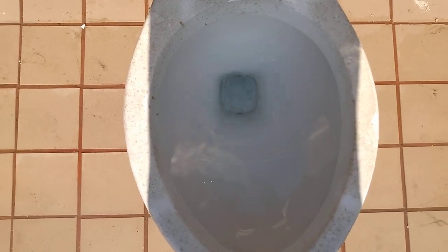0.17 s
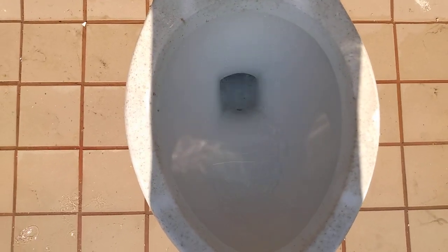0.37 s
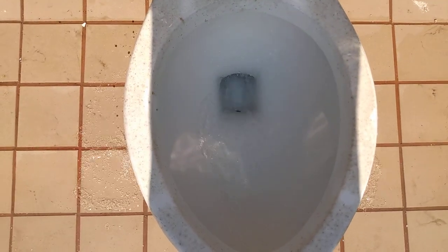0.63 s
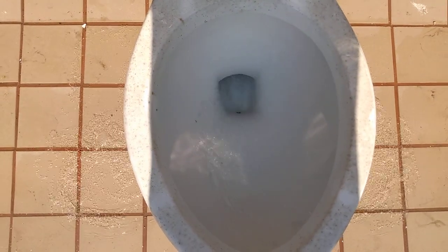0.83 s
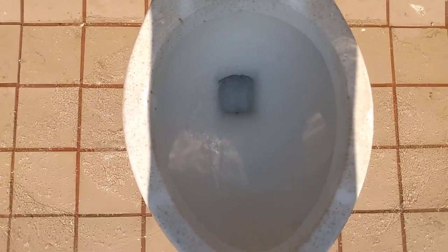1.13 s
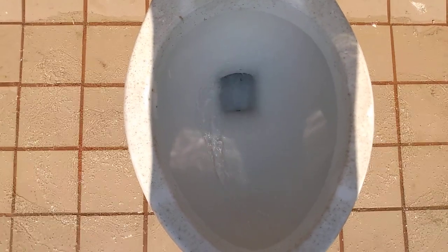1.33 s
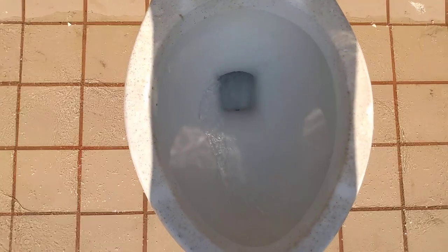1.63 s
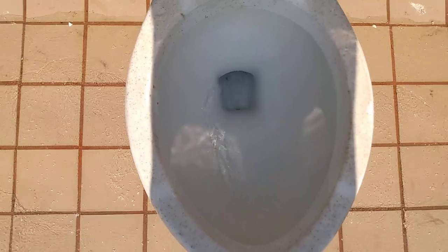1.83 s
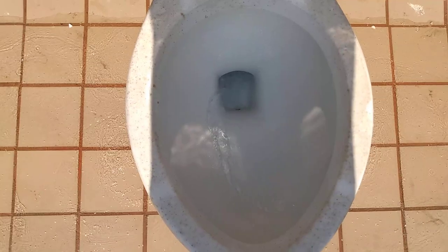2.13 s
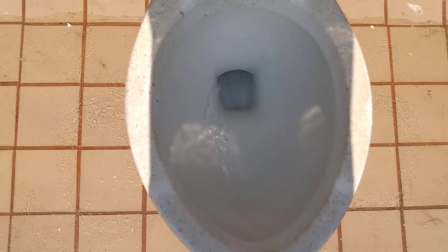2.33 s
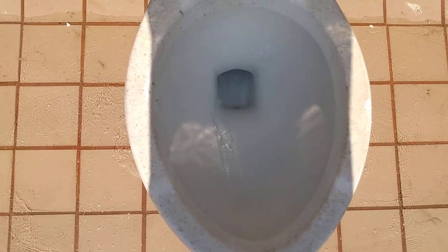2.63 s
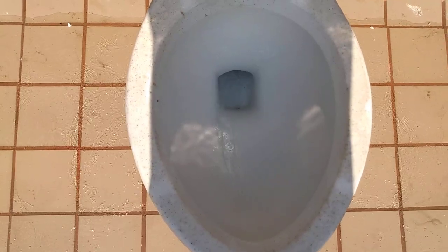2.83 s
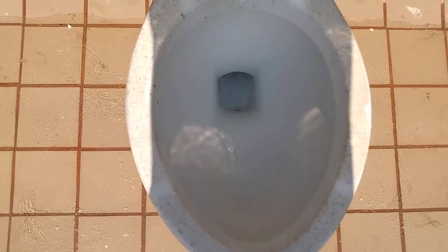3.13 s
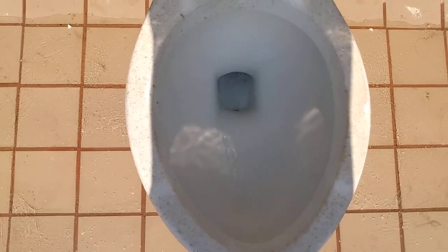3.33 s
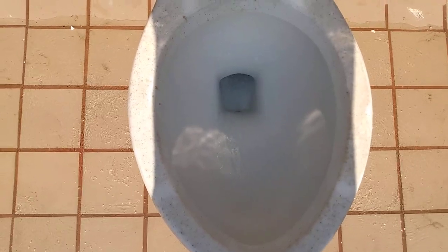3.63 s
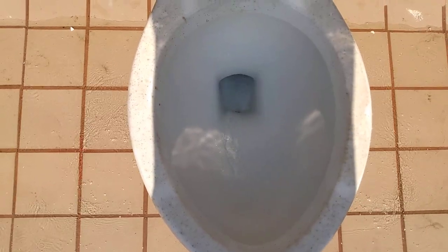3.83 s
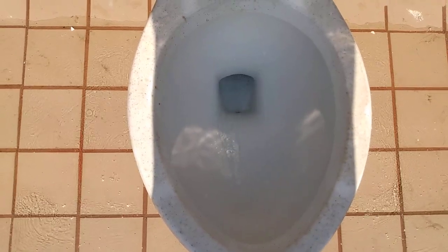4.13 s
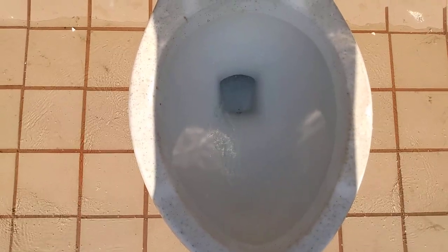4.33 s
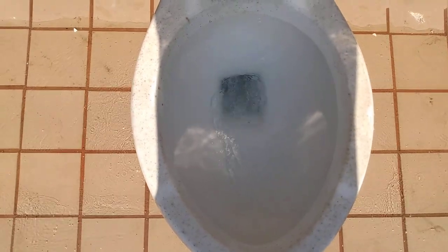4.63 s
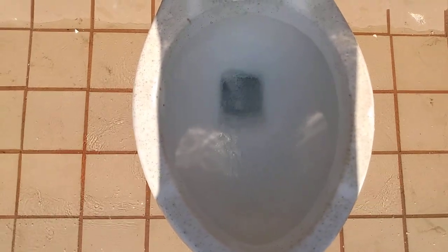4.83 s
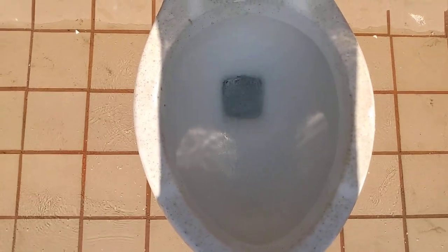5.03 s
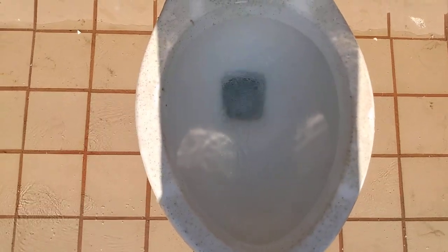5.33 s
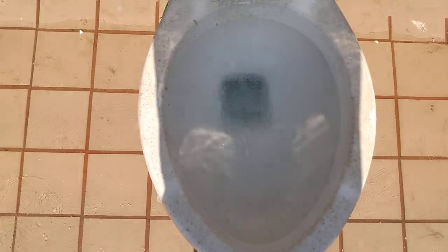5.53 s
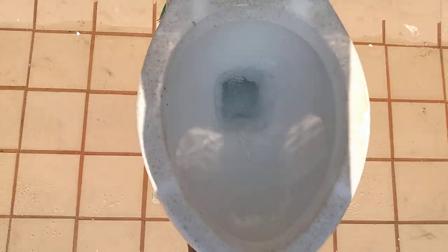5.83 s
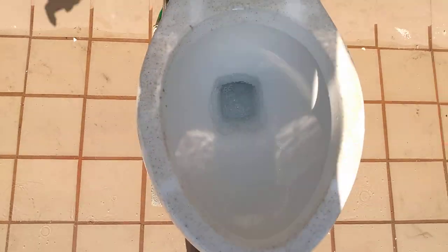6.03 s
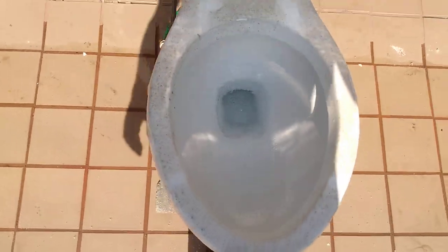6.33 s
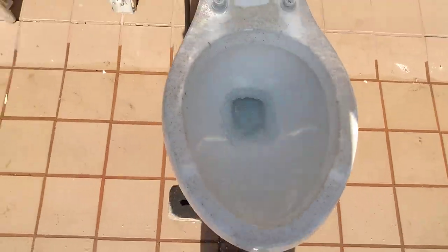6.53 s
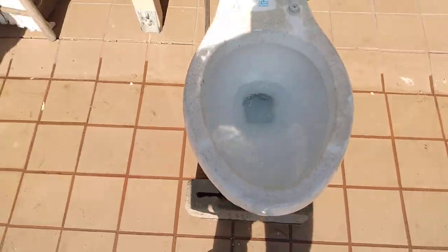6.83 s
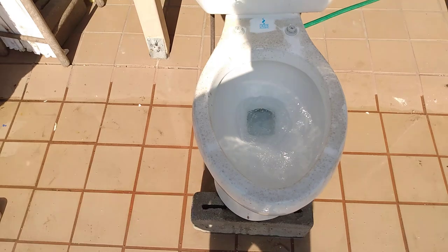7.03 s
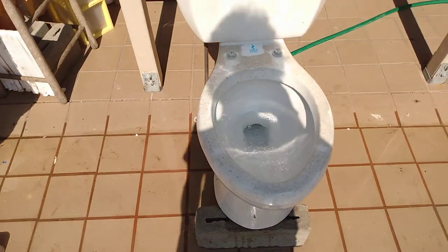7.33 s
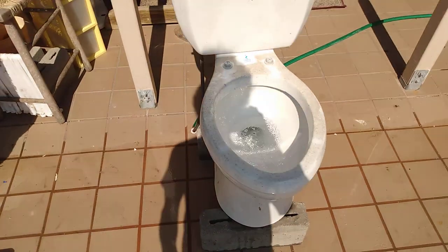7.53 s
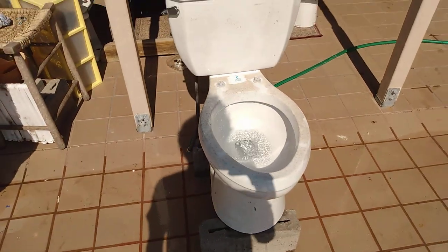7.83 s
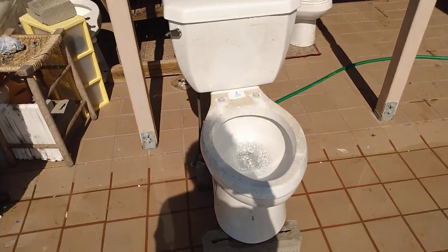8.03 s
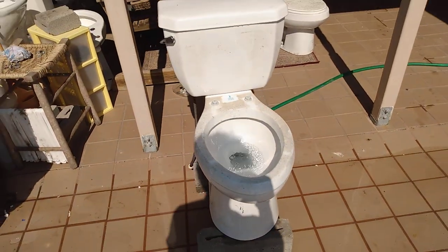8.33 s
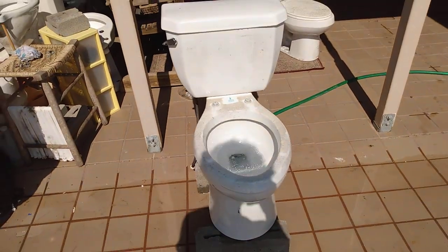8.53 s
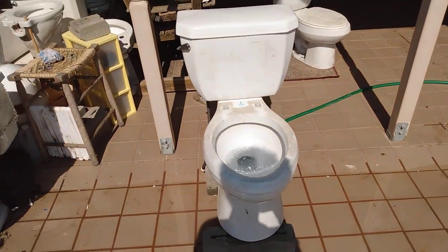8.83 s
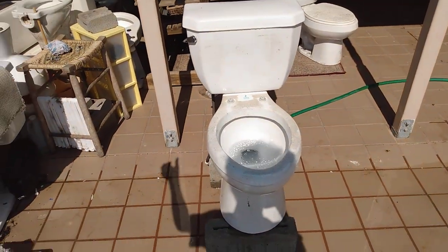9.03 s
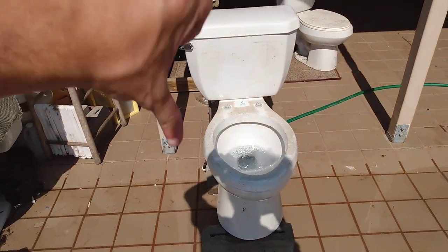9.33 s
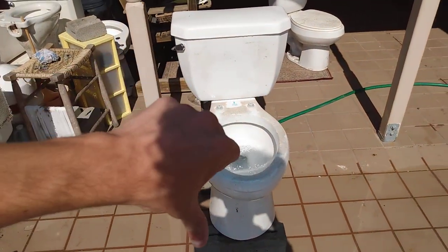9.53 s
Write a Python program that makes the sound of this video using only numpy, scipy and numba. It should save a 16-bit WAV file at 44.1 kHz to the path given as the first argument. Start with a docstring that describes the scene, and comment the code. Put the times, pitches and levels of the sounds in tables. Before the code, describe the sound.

A toilet flushes in the open air, heard by a stereo microphone just over the bowl. Booming air bubbles come first, then two wet, rising slurps, then a lively rush of spray, slaps and gurgles echoing tightly in the porcelain. It sags as the tank empties, babbles and cuts off. Small plops and trickles die away over steady valve hiss, and finally a gentle stream churns the pool.

```python
"""A toilet in the open air flushes, heard from just above the bowl. First air gulps boom in the bowl over a
gurgle of bubbles and noise, and two slurps of mostly climbing bubbles suck the pool out. Then splash and
spray, noise bursts and impacts echoed by the porcelain, spatter and sink as the tank runs down; the jet
stops, and last plops, sloshing, runnels and drips follow. The fill valve, filtered noise, hisses beneath
from the first half second; at the end the refill stream, a rush of tiny impacts, churns the pool."""
import sys
import numpy as np
from scipy import signal
from scipy.fft import rfft, irfft, next_fast_len
from scipy.io import wavfile
from scipy.ndimage import uniform_filter1d
from numba import njit

SR = 44100
rng = np.random.default_rng(int(sys.argv[2]) if len(sys.argv) > 2 else 0)


def materialize(psi):
    """Save the field psi as 16-bit PCM at rate SR to the path in sys.argv[1].

    A 1-D psi becomes a single channel; in a 2-D psi each row is a channel.
    """
    bounded = np.clip(np.atleast_2d(psi).T, -1, 1)
    quanta = np.round(bounded * 32767).astype(np.int16)
    wavfile.write(sys.argv[1], SR, quanta)


N = 427329
TIME = np.arange(N) / SR


def undb(db):
    """Decibels to gain."""
    return 10 ** (np.asarray(db) / 20)


def curve(table, column=1):
    """One column of a table, joined by straight lines in time and held beyond both ends."""
    rows = np.array(table)
    return np.interp(TIME, rows[:, 0], rows[:, column])


def hump(middle_s, length_s):
    """A smooth rise and fall between 0 and 1."""
    out = np.zeros(N)
    inside = slice(*np.searchsorted(TIME, [middle_s - length_s / 2, middle_s + length_s / 2]))
    out[inside] = np.cos(np.pi * (TIME[inside] - middle_s) / length_s) ** 2
    return out


def humps(table):
    """Gain of several humps, each row: middle in s, length in s, level in dB."""
    return sum(undb(db) * hump(middle_s, length_s) for middle_s, length_s, db in table)


def colour_db(points, hz):
    """A spectrum read on a log-frequency axis."""
    point_hz, db = np.transpose(points)
    return np.interp(np.log(hz + 1), np.log(point_hz), db)


def shape(x, response):
    """Filter by a response given as a function of frequency."""
    size = next_fast_len(x.shape[-1] + 4096)
    hz = np.arange(size // 2 + 1) * SR / size + .01  # never zero
    return irfft(rfft(x, size) * response(hz), size)[..., :x.shape[-1]]


def tint(x, points):
    """Filter by a spectrum of (Hz, dB) points."""
    return shape(x, lambda hz: undb(colour_db(points, hz)))


def resonance(hz, centre_hz, width_hz):
    """Response of one resonance, gain 1 at its centre."""
    return 1 / (1 + 1j * (hz ** 2 - centre_hz ** 2) / (hz * width_hz))


def unit(x):
    """Scale a stereo pair so that its middle has rms 1."""
    return x / np.std(x.mean(axis=0))


def surge(rate_hz, depth_db):
    """A randomly wandering gain, rate_hz new values a second, with mean power 1."""
    size = max(int(SR / rate_hz), 2)
    steps = np.repeat(rng.standard_normal(N // size + 1), size)
    gain = undb(depth_db * uniform_filter1d(steps, size)[:N])
    return gain / np.sqrt(np.mean(gain ** 2))


@njit
def ring(start_s, hz, cycles, size, rise, swell_cycles):
    """Each bubble is a sine that builds up, dies by 60 dB in its cycles and rises in pitch."""
    out = np.zeros(N)
    for k in range(len(start_s)):
        first, length = int(start_s[k] * SR), int(cycles[k] / hz[k] * SR)
        for i in range(min(length, N - first)):
            age, turn = i / length, i * hz[k] / SR
            envelope = np.exp(-6.9 * age) * (1 - np.exp(-(turn / swell_cycles) ** 2))
            out[first + i] += size[k] * envelope * np.sin(2 * np.pi * turn * (1 + rise * age / 2))
    return out


def swarm(pitch_hz, octaves, cycles, spread_db, count):
    """Bubbles at random moments, scattered in pitch, life and size."""
    when, pitch, life, size = rng.random((count, 4)).T
    centre_hz = np.broadcast_to(pitch_hz, N)[(when * N).astype(int)]
    hz = centre_hz * 2 ** (octaves * (pitch - .5))
    return ring(when * N / SR, hz, cycles * (.5 + life), undb(spread_db * size), 0.44, 1.09)


def drops(spread_db, count):
    """Tiny impacts at random moments: many weak, a few strong."""
    when, size, sign = rng.random((count, 3)).T
    strength = undb(-spread_db * np.log(np.maximum(size, .004)))
    return np.bincount((when * N).astype(int), strength * np.sign(sign - .5), N)


def porcelain(x, t60_s=0.081, split_hz=1400, lead_ms=0.085, stray_db=-20, even=0.067):
    """Quick reflections: treble reaches each port by its own paths, bass mostly straight, first port leading."""
    t = np.arange(2048) / SR
    paths = rfft(rng.standard_normal((2, len(t))) * np.exp(-np.log(1000) * t / t60_s))
    # flatten the paths' spectra, so the echoes colour the sound less
    paths = irfft(paths / np.abs(paths) ** min(even, 1)) * (1 - t / t[-1])
    paths /= np.linalg.norm(paths, axis=1, keepdims=True)
    low = signal.butter(3, split_hz, "low", fs=SR, output="sos")
    high = signal.butter(3, split_hz, "high", fs=SR, output="sos")
    bass = signal.sosfilt(low, signal.unit_impulse(len(t)))
    late_bass = np.interp(t - lead_ms / 1000, t, bass)
    response = np.array([bass, late_bass]) + signal.sosfilt(high, paths) + undb(stray_db) * paths
    return signal.oaconvolve(x[None], response, axes=1)[:, :N]


def bowl_air(x, modes):
    """The hollow of the bowl rings at its air resonances, above 100 Hz."""
    boom = shape(x, lambda hz: sum(undb(db) * resonance(hz, f, w) for f, w, db in modes))
    return signal.sosfilt(signal.butter(2, 100, "high", fs=SR, output="sos"), boom)


def bubbles(table, cycles, rise, swell_cycles, gain_db):
    """Single loud bubbles, each ringing at its own pitch."""
    start_s, db, hz = np.array(table, float).T.copy()
    lives = np.full(len(hz), float(cycles))
    tones = ring(start_s, hz, lives, undb(db + gain_db), float(rise), float(swell_cycles))
    return porcelain(tones, t60_s=0.05, even=0.94)


def puffs(table, decay_s, width_hz, gain_db):
    """Short decaying puffs of noise, each round its own centre."""
    out = np.zeros((2, N))
    t = np.arange(2048) / SR
    for start_s, db, centre_hz in table:
        noise = rng.standard_normal((2, len(t)))
        puff = shape(noise, lambda hz: resonance(hz, centre_hz, width_hz) ** 2)
        first = int(start_s * SR)
        out[:, first:first + len(t)] += unit(puff) * np.exp(-t / decay_s) * undb(db + gain_db)
    return out


def flush():
    """The tank empties: gurgle below, splash and spray above, both throbbing with the same jet."""
    splash_gain, spray_gain = jet_gains()
    churn = churning()
    jet = surge(rate_hz=45, depth_db=1.0)
    above = babble() + jet * (splash() * splash_gain + spray() * spray_gain)
    return above + damped(gurgle()) * churn + heave(churn)


def spatter(colour, spread_db, clump_db, count, spots):
    """Drops strike several spots round the bowl, count on each, arriving in common clumps."""
    clumps = surge(rate_hz=130, depth_db=clump_db)
    hits = sum(porcelain(drops(spread_db, count) * clumps, t60_s=0.034, even=0.93) for _ in range(spots))
    return unit(tint(hits, colour))


# Splash filter. Each row: frequency in Hz, relative level in dB.
SPLASH_FILTER = [(500, -23), (900, -20), (1300, -1), (1900, 2), (2250, -4), (2650, 7), (3500, -5),
                 (4500, 1), (7000, -18)]
# Higher bowl resonances. Each row: centre in Hz, width in Hz, relative level in dB.
BOWL_OVERTONES = [(1032, 8.4, 1), (1266, 55, 5.5), (1516, 48, 1.5), (1660, 45, 4.5), (1810, 44, -2),
                  (2020, 49, 4), (2460, 130, -1.5), (2840, 78, -14)]


def splash():
    """Drops on the bowl, small bubbles, and the higher bowl resonances that drops excite."""
    hits = spatter(SPLASH_FILTER, spread_db=4.0, clump_db=3.0, count=5000, spots=4)
    small_bubbles = unit(porcelain(swarm(2307, octaves=1.33, cycles=51, spread_db=20.0, count=2200)))
    ringing = unit(porcelain(bowl_air(drops(spread_db=6.0, count=12000), BOWL_OVERTONES)))
    return hits + undb(-9.5) * small_bubbles + undb(-3.5) * ringing


# Spray filter. Each row: frequency in Hz, relative level in dB.
SPRAY_FILTER = [(1800, -27), (3400, 0.5), (4400, -6), (5200, -1.5), (6300, -1.5), (7800, 2.5), (9200, 0.5),
                (11000, 4), (13000, -4.5), (16000, -8)]


def spray():
    """Fine drops on bare porcelain, with a fizz of tiny high bubbles."""
    hits = spatter(SPRAY_FILTER, spread_db=3.5, clump_db=1.0, count=9000, spots=5)
    tiny_bubbles = swarm(8420, octaves=1.27, cycles=28, spread_db=23, count=4000)
    fizz = unit(porcelain(tiny_bubbles, t60_s=0.05, even=0.42))
    return undb(1) * hits + undb(-8.0) * fizz


SHUT_S, SHUT_TAKES_S = 4.565, 0.1  # the flapper drops and the jet stops


def run_down(full_db, sag_db, bend, shut_change_db, drain_db_per_s):
    """Level in dB of a sound driven by the head of water: sags, shifts at the shutting while draining away."""
    spent = np.minimum(TIME / SHUT_S, 1)
    after_s = np.maximum(TIME - SHUT_S, 0)
    sagging_db = full_db - sag_db * spent ** bend
    shift_db = shut_change_db * np.minimum(after_s / SHUT_TAKES_S, 1)  # positive = drop, negative = lift
    return sagging_db - shift_db - drain_db_per_s * after_s


# Tank run-down of splash and spray. Columns: full-tank level in dB, sag until empty in dB, bend of the sag
# (1 = even), level change at the shutting in dB (positive = drop, negative = lift), draining in dB per s.
SPLASH_RUN_DOWN = (-21, 15.5, 0.49, -0.5, 54)
SPRAY_RUN_DOWN = (-16.5, 19, 0.82, 4.5, 31)
# The pool smothers the jet until sucked away. Each row: time in s, splash change in dB, spray change in dB.
POOL_SMOTHER = [(0.04, -9.5, -16.5), (0.12, -32, -19), (0.26, -24, -13), (0.285, -4, -12), (0.38, -6, -8.5),
                (0.452, -3, -13), (0.464, -5, 0)]
# The jet swells or falters. Each row: middle in s, length in s, splash change in dB, spray change in dB.
JET_SWELLS = [(0.017, 0.054, -1, 11), (0.944, 0.79, 4, 0), (1.396, 0.12, 3, 1.5), (1.492, 0.13, -4, -5),
              (1.804, 0.09, 6, 3), (2.246, 0.097, 5, -0.5), (3.189, 0.074, 1, 6), (3.988, .08, 6.5, -0.5),
              (4.565, 0.08, 0.5, -1), (4.655, 0.08, -4, -5)]


def jet_gains():
    """Splash and spray gains: head of water, smothering pool, momentary swells."""
    splash_db = run_down(*SPLASH_RUN_DOWN) + curve(POOL_SMOTHER, column=1)
    spray_db = run_down(*SPRAY_RUN_DOWN) + curve(POOL_SMOTHER, column=2)
    for middle_s, length_s, more_splash_db, more_spray_db in JET_SWELLS:
        swell = hump(middle_s, length_s)
        splash_db = splash_db + more_splash_db * swell
        spray_db = spray_db + more_spray_db * swell
    return undb(splash_db), undb(spray_db)


# Bowl air resonances, shared with gulps(). Each row: centre in Hz, width in Hz, relative level in dB.
BOWL_MODES = [(238.5, 5.1, -3), (298.6, 82, 3), (430, 260, -8), (632.3, 53, 5), (684, 37, -3.5),
              (1037, 22, 1), (1227, 170, -4.5)]


def gurgle():
    """Tumbling water and big bubbles drive the air in the bowl."""
    big_bubbles = swarm(416.5, octaves=2.37, cycles=11.7, spread_db=17.0, count=2200)
    tumbling = drops(spread_db=2.5, count=25000)
    push = big_bubbles / big_bubbles.std() * undb(-7.5) + tumbling / tumbling.std() * undb(10.0)
    return unit(porcelain(bowl_air(push * surge(rate_hz=50, depth_db=1.35), BOWL_MODES)))


def damped(x, pool_db=-5.5, gone_s=0.53, above_hz=560):
    """While the pool still fills the bowl, only the deepest part of a sound comes through in full."""
    deep = shape(x, lambda hz: 1 / (1 + (hz / above_hz) ** 8))
    return deep + (x - deep) * undb(pool_db * np.clip(1 - (TIME / gone_s) ** 2, 0, 1))


# Big gulps of air in the trap. Each row: start in s, level in dB before layer gain, pitch in Hz.
AIR_GULPS = [(0.023, -4.5, 306), (.089, -5.5, 278), (0.105, -5, 226), (.158, -11, 215), (.205, -14, 225),
             (.27, -8, 248), (.312, -7.5, 290), (0.347, -6.5, 290), (1.39, -9, 286), (2.062, -18.5, 227),
             (2.117, -15, 232), (2.198, -16.5, 296), (2.253, -16, 260), (2.52, -13.5, 257),
             (2.939, -23, 250), (3.061, -15, 255), (3.433, -20.5, 340), (4.328, -18.5, 288),
             (4.944, -31, 273), (4.979, -29.5, 231)]


def gulps(boom_db=-4):
    """Big pockets of air break through the trap and set the bowl booming."""
    start_s, db, hz = np.array(AIR_GULPS, float).T.copy()
    knocks = np.bincount((start_s * SR).astype(int), undb(db), N)
    boom = bowl_air(knocks, BOWL_MODES)
    boom *= undb(db.max() + boom_db) / np.abs(boom).max()
    tones = bubbles(AIR_GULPS, cycles=12.8, rise=0.077, swell_cycles=1.52, gain_db=4.5)
    return tones + porcelain(boom)


# Tank run-down of the gurgle. Columns: full-tank level in dB, sag until empty in dB, bend of the sag
# (1 = even), level change at the shutting in dB (positive = drop, negative = lift), draining in dB per s.
GURGLE_RUN_DOWN = (-18, 21.5, 0.53, -5.5, 60)
WAKE_DB, WAKE_DECAY_S = -25, 0.056  # churning after each gulp, relative to its table level
ONRUSH_DB, ONRUSH_MIDDLE_S, ONRUSH_LENGTH_S = -25.5, 0.19, 1


def churning():
    """Gurgle gain: head of water, the first onrush through the full pool, a short wake after every gulp."""
    start_s, db, hz = np.array(AIR_GULPS, float).T
    kicks = np.bincount((start_s * SR).astype(int), undb(db + WAKE_DB), N)
    wakes = signal.lfilter([1], [1, -np.exp(-1 / (WAKE_DECAY_S * SR))], kicks)
    onrush = undb(ONRUSH_DB) * hump(ONRUSH_MIDDLE_S, ONRUSH_LENGTH_S)
    return np.sqrt(undb(run_down(*GURGLE_RUN_DOWN)) ** 2 + wakes ** 2 + onrush ** 2)


# Low resonances of the water-filled trap. Each row: centre in Hz, width in Hz, relative level in dB.
TRAP_MODES = [(77, 18, -2), (124.5, 20, 1.5), (167, 33, -2.5)]
# The water column heaves. Each row: middle in s, length in s, level in dB.
COLUMN_HEAVES = [(.14, 0.5, -30), (1.264, 0.61, -48.5), (2.154, 0.41, -47.5), (2.554, 0.14, -42),
                 (3.5, 0.12, -56.5)]


def heave(churn, follow_db=-27):
    """The slug of water in the trap shudders low with the churning, and more at each heave."""
    def modes(hz):
        return sum(undb(db) * np.abs(resonance(hz, f, w)) ** 2 for f, w, db in TRAP_MODES)
    shudder = shape(rng.standard_normal(N), modes)
    return shudder / shudder.std() * (humps(COLUMN_HEAVES) + churn * undb(follow_db))


BABBLE_DB, BABBLE_RISE_S = -45.5, 0.98
BABBLE_SWELL_DB, BABBLE_SWELL_S, BABBLE_DRAIN_DB_PER_S = 5, 0.87, 92.5


def babble():
    """Air drawn into the emptied trap babbles, most of all as the jet gives out."""
    crowd = swarm(1402, octaves=1.6, cycles=24, spread_db=11, count=4200)
    crowd = unit(porcelain(crowd, t60_s=0.034, even=0.92))
    swell_db = BABBLE_SWELL_DB * np.clip(1 + (TIME - SHUT_S) / BABBLE_SWELL_S, 0, 1)
    drain_db = BABBLE_DRAIN_DB_PER_S * np.maximum(TIME - SHUT_S, 0)
    return crowd * np.minimum(TIME / BABBLE_RISE_S, 1) * undb(BABBLE_DB + swell_db - drain_db)


# The pool leaves in two draughts. Each row: time in s, bubble pitch in Hz, level in dB.
FIRST_DRAUGHT = [(.40, 400, -40), (.455, 626, -27), (.48, 850, -17), (.502, 900, -14.5), (.52, 1400, -21.5),
                 (.575, 1700, -17), (.63, 1540, -26.5)]
SECOND_DRAUGHT = [(.595, 770, -32.5), (.635, 920, -24), (.678, 1300, -19), (.70, 1580, -24.5),
                  (.75, 1540, -21), (.80, 1890, -30.5)]


def slurp(draught, spots=3):
    """A crowd of bubbles mostly climbs in pitch as the pool leaves, bursting round the trap."""
    pitch_hz = curve(draught)
    sounding = (TIME > draught[0][0]) & (TIME < draught[-1][0])
    crowd = 0
    for _ in range(spots):
        spot = swarm(pitch_hz, octaves=1.3, cycles=9, spread_db=5.5, count=9000)
        crowd = crowd + porcelain(spot, t60_s=0.022, split_hz=2000, even=1.0)
    level = undb(curve(draught, column=2)) * sounding
    return crowd / np.std(crowd.mean(axis=0)[sounding]) * level


# Sheets of water on the bare bowl. Each row: start in s, level in dB before layer gain, centre in Hz.
WATER_SLAPS = [(.861, -5, 2680), (.905, -2.5, 2000), (.971, -1, 2200), (1.001, -5.5, 3100),
               (1.012, -6.5, 3800), (1.041, -10, 2700), (1.089, -5.5, 1970), (1.393, -9.5, 1900),
               (1.404, -10, 2500), (1.61, -10.5, 2600), (1.705, -8, 2560), (1.79, -7, 2450),
               (1.811, -9.5, 2360), (2.229, -12, 2510), (2.622, -17, 2800), (2.648, -10.5, 2800),
               (3.782, -13.5, 2790), (3.915, -19, 3400), (4.217, -18, 1900)]


def slaps():
    """Sheets of water slap the bare bowl: short mid-band noise puffs."""
    return puffs(WATER_SLAPS, decay_s=0.0034, width_hz=2460, gain_db=-10.5)


# Spits of spray on porcelain. Each row: start in s, level in dB before layer gains, centre in Hz.
SPRAY_SPITS = [(0.772, -6.5, 10600), (0.9527, -7, 6900), (1.089, -6, 9500), (1.138, -11, 8500),
               (1.227, -7.5, 10500), (1.245, -8, 7800), (1.384, -9, 9000), (1.406, -10, 10000),
               (1.5614, -5.5, 8260), (1.604, -5, 7550), (1.6104, -7, 8600), (1.7474, -9, 7950),
               (1.9552, -6, 10400), (2.0352, -5.5, 7200), (2.2548, -8.5, 12000), (2.6225, -9, 6200),
               (2.707, -12, 8500), (3.670, -17, 9000), (3.700, -16, 8500), (3.7184, -14, 8900),
               (3.904, -16, 8590), (3.9818, -14, 7700), (4.0004, -13.5, 8000), (4.4877, -17, 11100)]


def spits():
    """Spits of spray: treble noise puffs, each opening with a sharp, broad crack."""
    body = puffs(SPRAY_SPITS, decay_s=0.0031, width_hz=2400, gain_db=-5.0)
    crack = puffs(SPRAY_SPITS, decay_s=0.0012, width_hz=7600, gain_db=-9)
    return body + crack


# Single surface bubbles. Each row: start in s, level in dB before layer gains, pitch in Hz.
SURFACE_PLOPS = [(0.05, -7, 702), (0.904, -19, 670), (0.97, -11, 1263), (1.086, -17, 674),
                 (1.39, -24, 1270), (1.703, -28, 724), (1.706, -11, 2530), (2.226, -16.5, 672),
                 (2.823, -21.5, 623), (2.9, -21, 728), (3.058, -23.5, 740), (3.849, -16, 2700),
                 (3.86, -27, 684), (3.927, -26, 645), (3.956, -22, 1370), (4.019, -18, 1110),
                 (4.038, -17, 641), (4.095, -20.5, 2100), (4.169, -14, 1280), (4.216, -20, 1270),
                 (4.232, -16.5, 2800), (4.235, -19, 2460), (4.238, -22, 734), (4.287, -20.5, 633),
                 (4.396, -21, 1240), (4.408, -23.5, 870), (4.424, -21, 1310), (4.479, -29, 1460),
                 (4.527, -17.5, 1400), (4.565, -23, 1240), (4.586, -18.5, 1290), (4.655, -24.5, 1210),
                 (4.71, -32, 660), (4.739, -24, 1330), (4.758, -25.5, 1210), (4.922, -23, 2000),
                 (4.948, -25, 2080), (4.981, -35, 630), (5.117, -24, 2700), (5.162, -33, 2780),
                 (5.226, -35, 2700), (5.256, -31, 2000), (5.353, -37, 2500), (5.405, -41, 644),
                 (5.413, -35, 2650), (5.441, -25, 3400), (5.509, -24, 2820), (5.511, -23, 1920),
                 (5.529, -34, 647), (5.581, -33, 1900), (6.2, -35, 2050)]


def plops():
    """Single bubbles ring at the surface, each opening with the snap of its film."""
    tones = bubbles(SURFACE_PLOPS, cycles=29.8, rise=0.087, swell_cycles=3.07, gain_db=5.0)
    films = [(start_s, db, 2700) for start_s, db, hz in SURFACE_PLOPS]
    snaps = puffs(films, decay_s=0.014, width_hz=9600, gain_db=-24.5)
    return tones + fragments() + snaps


def fragments(above_hz=1000, within_s=0.013, gain_db=-6, octaves=0.51, cycles=22, spread_db=8, count=4):
    """A small plop is ragged: it sheds a few bubbles close to its own pitch."""
    small = [row for row in SURFACE_PLOPS if row[2] > above_hz]
    start_s, db, hz = np.repeat(small, count, axis=0).T
    delay, pitch, size = rng.random((len(start_s), 3)).T
    shed_s = start_s + within_s * delay ** 2
    shed_hz = hz * 2 ** (octaves * (pitch - .5))
    lives = np.full(len(hz), float(cycles))
    shed = ring(shed_s, shed_hz, lives, undb(db + gain_db - spread_db * size), 0.12, 2.0)
    return porcelain(shed, t60_s=0.033, even=0.67)


# The trap hollow sings. Each row: middle in s, length in s, level in dB.
TRAP_PINGS = [(2.265, 0.14, -35.5), (3.04, 0.17, -31.5), (3.15, 0.11, -36.5), (3.84, 0.13, -40)]


def singing(centre_hz=1042, width_hz=34):
    """The flow blows over the hollow of the trap: a wavering note that swells and fades."""
    note = shape(rng.standard_normal(N), lambda hz: resonance(hz, centre_hz, width_hz) ** 2)
    return note / note.std() * humps(TRAP_PINGS)


# Slosh filter. Each row: frequency in Hz, relative level in dB.
SLOSH_FILTER = [(60, -22), (130, -3), (220, -5), (370, 0.5), (480, -16), (620, -23), (900, -48)]
# The pool rocks until it covers the trap mouth. Each row: middle in s, length in s, level in dB.
POOL_SLOSHES = [(4.886, 0.38, -55), (5.115, 0.28, -55.5), (5.378, 0.32, -56.5), (5.915, 0.71, -59.5)]


def slosh():
    """After the jet has stopped the pool rocks in the trap with a soft, low burble."""
    glugs = porcelain(swarm(293, octaves=1.62, cycles=6.7, spread_db=9, count=3000))
    return unit(tint(glugs, SLOSH_FILTER)) * humps(POOL_SLOSHES)


# Runnels drop off the walls at once. Each row: middle in s, length in s, level in dB before the high-pass.
WALL_RUNNELS = [(4.567, 0.15, -41), (4.93, 0.04, -44.5), (4.969, 0.06, -40.5), (5.122, 0.02, -49),
                (5.517, 0.035, -47)]
TRICKLE_DB, TRICKLE_START_S, TRICKLE_END_S = -59, 4.6, 5.65  # level before the high-pass


def trickle(fade_s=0.1, above_hz=1200):
    """The last runnels tinkle into the pool, making only small bubbles."""
    tinkle = unit(porcelain(swarm(2430, octaves=1.26, cycles=22, spread_db=8.0, count=7000)))
    tinkle = signal.sosfilt(signal.butter(8, above_hz, "high", fs=SR, output="sos"), tinkle)
    dribble = np.clip(np.minimum(TIME - TRICKLE_START_S, TRICKLE_END_S - TIME) / fade_s, 0, 1)
    return tinkle * (undb(TRICKLE_DB) * dribble + humps(WALL_RUNNELS))


# Last drips on porcelain. Each row: start in s, level in dB before layer gain, centre in Hz.
LAST_DRIPS = [(5.162, -35, 8700), (5.371, -34, 10500), (5.441, -28, 10000), (5.516, -32, 10500),
              (5.522, -32, 10000), (5.5302, -23, 9300)]


def drips():
    """The last drips tick on the porcelain: very short treble puffs."""
    return puffs(LAST_DRIPS, decay_s=0.0022, width_hz=5200, gain_db=-4.0)


# Refill rush filter. Each row: frequency in Hz, relative level in dB.
POOL_FILTER = [(30, -37), (70, -13), (110, -18), (170, -7), (240, -1), (450, -3), (630, -5), (950, 2.5),
               (1060, -1), (1200, -11), (1750, -12), (2600, -20.5), (4000, -32)]
# Refill stream. Each row: time in s, level in dB before bass change and balance.
REFILL_LEVEL = [(5.3, -76), (5.7, -67), (6.3, -61), (6.5, -61), (6.8, -54), (7.3, -50), (7.7, -46),
                (8.15, -44.5), (8.75, -44.5), (9.1, -48), (9.69, -49.5)]


def refill(half_lean_db=0.5, deepen_db_per_s=6, spots=3):
    """The refill stream stirs the pool: a soft rush of tiny impacts, deeper as the water rises."""
    stir = 0
    for _ in range(spots):
        impacts = drops(spread_db=2.0, count=9000)
        stir = stir + porcelain(impacts, t60_s=0.047, split_hz=1170, lead_ms=0.28, stray_db=-15.5, even=0.68)
    stir = stir[::-1]  # right port first
    rush = unit(tint(stir, POOL_FILTER)) * surge(rate_hz=12, depth_db=1.23)
    bass = shape(rush, lambda hz: 1 / (1 + (hz / 330) ** 4))
    bass_gain = undb(deepen_db_per_s * np.clip(TIME - 8.4, -1.2, 1))
    rush = rush + bass * (bass_gain - 1)
    return rush * undb(curve(REFILL_LEVEL)) * undb([[-half_lean_db], [half_lean_db]])


# Valve hiss filter. Each row: frequency in Hz, relative level in dB.
VALVE_FILTER = [(30, -29), (70, -4.5), (120, -17.5), (230, -15), (380, -14), (490, -2), (600, -14.5),
                (700, -5), (800, -30), (960, -7), (1140, -49), (1380, -21.5), (1600, -1.5), (2150, -4.5),
                (2500, -8), (3100, -7), (3700, 0.5), (7500, 0), (10000, -0.5), (13000, -9.5), (16000, -18)]
# Fill valve. Each row: time in s, level in dB before trim and balance.
VALVE_LEVEL = [(4.9, -47), (6.4, -47), (6.9, -47.5), (7.3, -51), (8.7, -50.5), (9.69, -51.5)]


def valve(half_lean_db=1.3, shared_hz=600, bowl_db=2, trim_db=.5, opening_s=.5):
    """Water squeezes through the fill valve: a diffuse hiss, part of it sounding out through the bowl."""
    common, left, right = rng.standard_normal((3, N))
    # only the bass is alike at both ports
    diffuse = shape(np.array([left, right]), lambda hz: hz / np.hypot(hz, shared_hz))
    jets = diffuse + shape(common, lambda hz: shared_hz / np.hypot(hz, shared_hz))
    through_bowl = porcelain(rng.standard_normal(N), t60_s=0.08, even=0.5)
    jets += undb(bowl_db) * through_bowl * surge(rate_hz=6, depth_db=0.8)
    opening = np.clip(TIME / opening_s, 0, 1)
    hiss = unit(tint(jets, VALVE_FILTER)) * surge(rate_hz=25, depth_db=1.0)
    return hiss * undb(curve(VALVE_LEVEL) + trim_db) * opening * undb([[-half_lean_db], [half_lean_db]])


def scene():
    """Sum of the flush, its single events, the last water and the refill."""
    slurps = slurp(FIRST_DRAUGHT) + slurp(SECOND_DRAUGHT)
    events = gulps() + slaps() + spits() + plops() + singing()
    last_water = slosh() + trickle() + drips()
    return flush() + slurps + events + last_water + refill() + valve()


# Treble difference of the two microphone ports. Each row: frequency in Hz, left minus right in dB.
PORT_LEAN = [(100, 1.5), (250, 1), (4000, 1), (7300, -1.5), (8600, 2.5), (10500, 12.5), (13000, 12),
             (16000, 14)]
TOP_HZ = 15900


def record(dry):
    """The left port is mostly brighter than the right; the top is cut."""
    def ports(hz):
        lean = undb(colour_db(PORT_LEAN, hz))
        return np.array([lean, np.ones_like(lean)]) * np.sqrt(2 / (1 + lean ** 2))  # constant summed power
    sound = np.clip(shape(dry, ports), -1, 1)
    return signal.sosfilt(signal.ellip(10, .2, 70, TOP_HZ, fs=SR, output="sos"), sound)


dry = scene()
out = record(dry)
materialize(out)
```